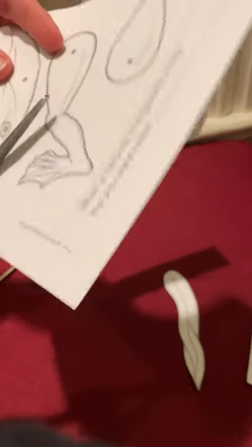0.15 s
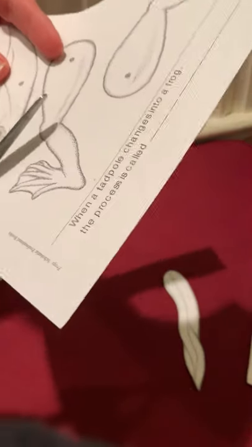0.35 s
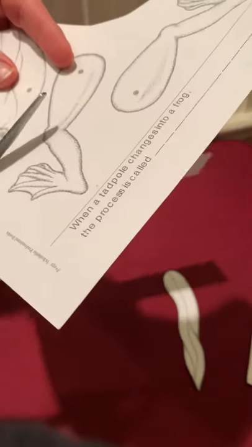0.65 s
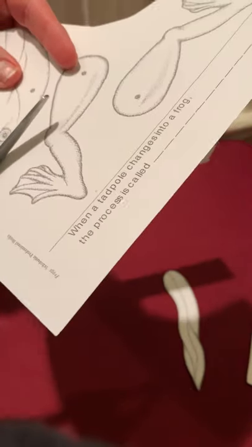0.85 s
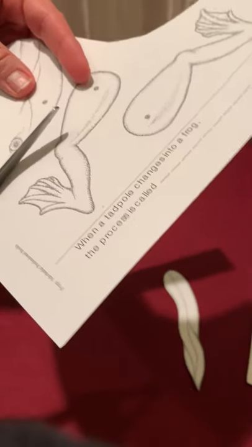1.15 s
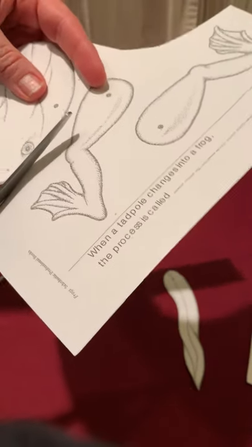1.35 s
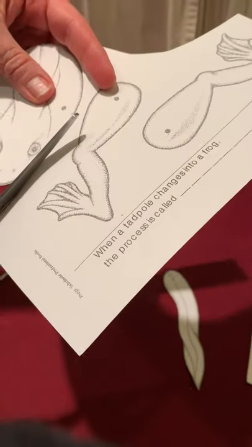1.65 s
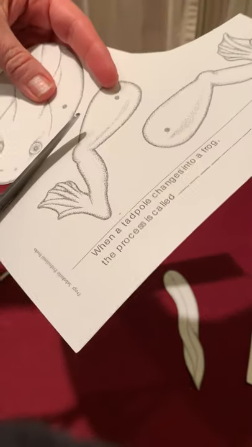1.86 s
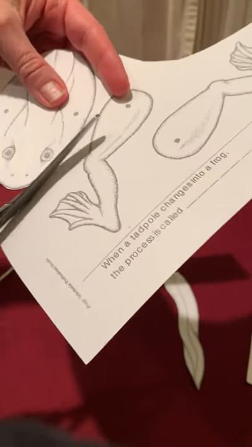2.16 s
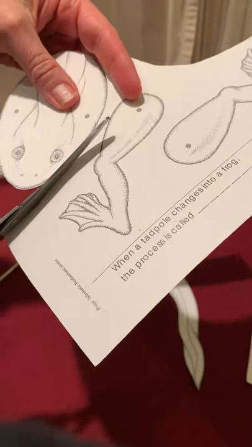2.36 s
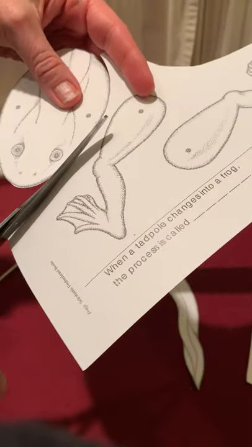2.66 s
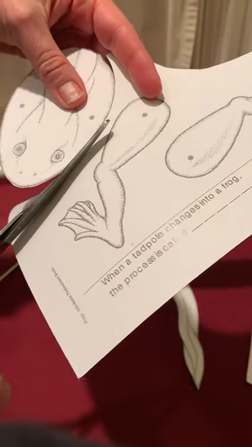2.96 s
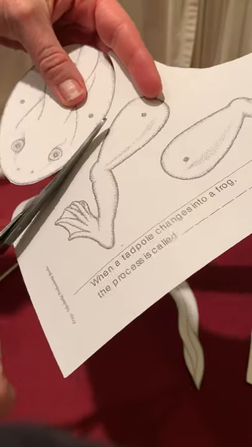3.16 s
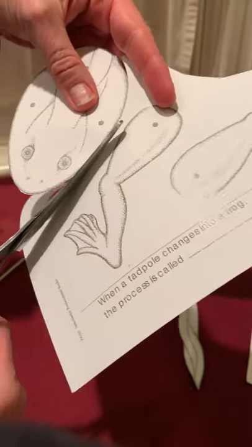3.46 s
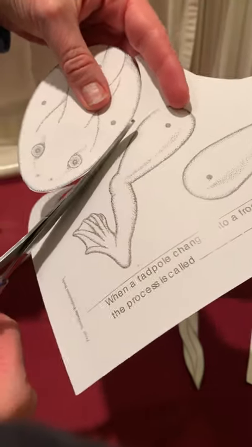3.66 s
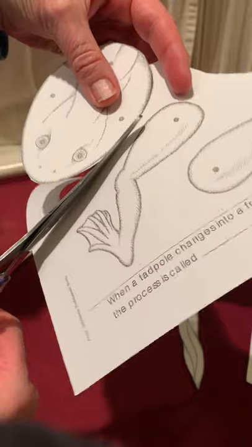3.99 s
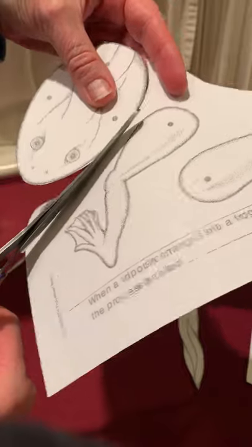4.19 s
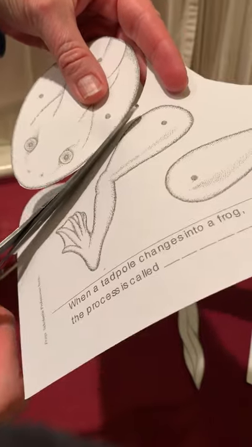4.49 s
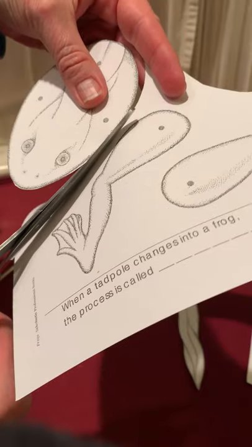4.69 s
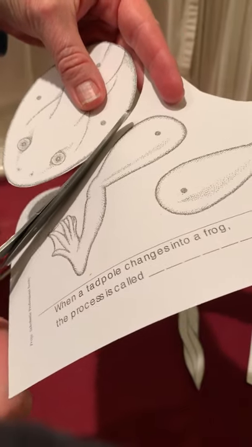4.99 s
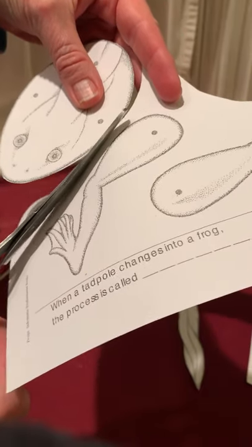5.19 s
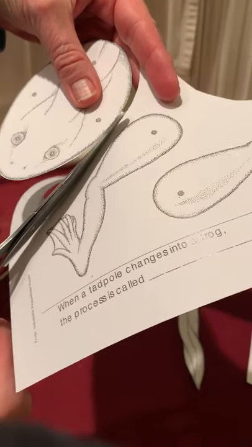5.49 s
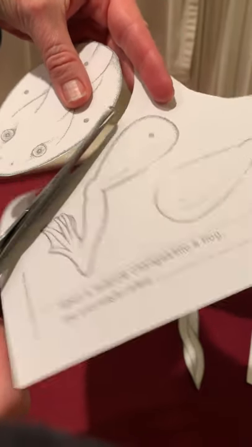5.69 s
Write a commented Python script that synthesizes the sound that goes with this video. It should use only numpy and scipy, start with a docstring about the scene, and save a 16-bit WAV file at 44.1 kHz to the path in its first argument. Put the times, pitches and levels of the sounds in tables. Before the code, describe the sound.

Scissors crunch through stiff card in short irregular snips, with papery rubbing and a few soft low thumps, close up in a quiet room.

```python
"""Crisp crunches, papery rubbing and a few soft thumps: scissors work through hand-held cardstock in a quiet room.
Each bite is a burst of fibre snaps that excites a crunch, the ringing sheet, a papery flap and a bright fizz.
Between bites, grain noise shaped by hand strokes and blade drag makes the rubbing; now and then the sheet buckles
with a low sine whose pitch sags. Two microphones hear it close up, over a faint room and its tone.
"""
import sys
import numpy as np
from scipy import signal
from scipy.fft import rfft, irfft, next_fast_len
from scipy.io import wavfile
from scipy.ndimage import uniform_filter1d, map_coordinates

SR = 44100
rng = np.random.default_rng(int(sys.argv[2]) if len(sys.argv) > 2 else 0)


def dump(signal):
    """Clip the signal to [-1, 1] and save it as 16-bit WAV at the path in sys.argv[1]."""
    limited = np.clip(np.atleast_2d(signal).T, -1, 1)
    pcm = np.round(limited * 32767).astype(np.int16)
    wavfile.write(sys.argv[1], SR, pcm)


N = 257323
TIME = np.arange(N) / SR  # s

# Steady tone of the room. Each row: frequency in Hz, relative level in dB.
ROOM_TONE_COLOUR = [(85, -2), (200, -12), (1000, -31.5), (3000, -32.5), (16000, -35.5)]
ROOM_T60 = 0.23  # s
# Phase between the two microphones. Each row: frequency in Hz, lead of the left one in radians.
LEFT_LEAD = [(90, 0), (400, -.8), (620, -.3), (950, -1.2), (1400, -.1), (2000, .4), (2550, 1.7),
             (3400, 1.3), (4850, 3.14), (9100, 9.42), (13400, 15.7), (16000, 19.5)]
# Level between the two microphones. Each row: frequency in Hz, left minus right in dB.
LEFT_BALANCE = [(750, .5), (1350, -3), (1800, -0.8), (2500, -2), (3300, -0.5)]
BAND_LIMIT = 16100  # Hz

# The sheet buckles. Each row: start in seconds, level in dB before attack and decay,
# pitch it settles to in Hz, time to fall 60 dB in seconds.
BUCKLES = [(.108, -48, 127, 0.14), (0.214, -50, 125, 0.17), (1.228, -39.5, 59.5, 0.14),
           (3.313, -39.5, 81, 0.16), (5.731, -27.5, 89.3, 0.056), (5.79, -38.5, 60.6, 0.16)]
# Low flexing of the sheet. Each row: frequency in Hz, relative level in dB.
FLEX_COLOUR = [(25, -16.5), (90, -4.5), (300, 0), (600, -9), (1500, -65)]

# Card slides over steel and fingers. Each row: start in seconds, length in seconds, nominal rub level in dB,
# flexing in dB relative to the rub, hiss in dB relative to the rub.
STROKES = [(0, 0.024, -60, -6.5, 3), (0.026, .035, -71, -5, 6), (0.071, 0.049, -61, -5, 1.5),
           (0.125, 0.042, -52, -6.5, -3.5), (0.194, 0.028, -52.5, 0, 2.5), (0.282, 0.069, -57.5, 1, -8.5),
           (0.348, 0.073, -66, -8, -12), (1.108, 0.0087, -68, -14, -0.5), (1.414, 0.035, -66.5, -4.5, -10),
           (1.97, 0.063, -49.5, -5, -7.5), (2.346, 0.11, -70.5, -16, -12), (2.45, 0.06, -60.5, -23, -6.5),
           (2.608, 0.016, -59.5, -22, -16), (2.665, 0.013, -61, -18, -11), (2.742, 0.013, -62, -14, -10.5),
           (2.81, .016, -44.5, -11.5, -15), (2.925, 0.17, -51, -14, -16), (3.126, 0.019, -46, -24, -16.5),
           (3.261, 0.042, -47, -11, -10), (3.758, 0.071, -54, -6, -13), (3.84, 0.12, -71, -14, -3),
           (3.997, 0.067, -64, -17.5, -2.5), (4.07, 0.14, -70, -19, -9), (4.204, 0.086, -46, -10, -20.5),
           (4.355, 0.029, -57, -7.5, -21), (4.397, 0.033, -54, -8, -19), (4.596, 0.042, -56, -2.5, -17),
           (4.725, 0.024, -56.5, -8, -16), (4.821, 0.029, -62, -9.5, -17.5), (4.882, 0.032, -58.5, -4, -31),
           (4.992, 0.093, -61, -6.5, -23), (5.149, 0.028, -53.5, -9.5, -20),
           (5.23, 0.072, -55.5, -2.5, -24), (5.417, .025, -65.5, -3, -35), (5.747, 0.033, -59.5, 8.5, -11),
           (5.816, 0.023, -63, 15, -25)]
# A stroke swells before its start, arches over its length and dies away after it.
SWELL_DB_PER_S, ARCH_DB, FADE_DB_PER_S = 1050, 3.5, 400.5
# The blades press into the card just before a bite and drag on ever more lightly after it.
PRESS_DB_PER_S, DRAG_FADE_DB_PER_S = 1701, 240
DRAG_DB = -18.5  # relative to the bite's crunch
DRAG_FLEX_DB, DRAG_HISS_DB = -6, -12.5  # relative to the drag
# Rubbing while the sheet slides loose. Each row: frequency in Hz, relative level in dB.
LOOSE_RUB_COLOUR = [(300, -34.5), (560, 0.5), (830, 1.5), (1100, -3), (1800, -0.5), (2700, -4.5), (3400, 3),
                    (4200, -13.5), (9000, -73)]
# Rubbing while the sheet is wedged. Each row: frequency in Hz, relative level in dB.
WEDGED_RUB_COLOUR = [(300, -40), (650, 1), (1120, -4), (1360, 3), (2300, -5.5), (3200, -8.5), (4300, -17),
                     (9000, -80.5)]
# Fine hiss of the rubbing. Each row: frequency in Hz, relative level in dB.
HISS_COLOUR = [(2500, -19), (5200, 0), (7850, -9.5), (8200, -10.5), (10000, -7.5), (11000, -13.5),
               (15700, -26.5)]

# Progress of the cut. Each row: time in seconds, wedging from 0 (loose in the hand) to 1 (wedged along the blades).
WEDGING = [(.8, 0.048), (1.9, 0.5), (3.1, 1)]
# Lowest bending mode of the held sheet: Hz when loose, Hz when wedged.
BEND_HZ = (186.6, 301)

# The blades bite. Each row: start in seconds, length in seconds, crunch level in dB before the held sheet colours it.
BITES = [(0.472, 0.021, -52.5), (0.521, 0.026, -48.5), (.577, 0.021, -42), (0.61, 0.022, -49),
         (0.677, 0.012, -43), (0.735, 0.0066, -40), (0.806, 0.014, -45), (.827, 0.012, -51),
         (0.843, 0.014, -52), (0.857, 0.04, -55.5), (.908, 0.0089, -54), (1.187, .008, -47.5),
         (1.349, 0.0082, -44.5), (1.381, 0.018, -57.5), (1.512, 0.0087, -51.5), (1.538, 0.009, -59),
         (1.616, 0.0049, -48.5), (1.662, 0.009, -46), (1.678, .01, -46), (1.693, 0.011, -45.5),
         (2.245, 0.02, -44.5), (2.269, 0.017, -41.5), (2.294, 0.017, -42), (2.316, 0.016, -46.5),
         (2.563, 0.0096, -43), (2.791, 0.0097, -37), (2.837, 0.0039, -48), (2.868, 0.01, -48.5),
         (2.947, 0.013, -42.5), (2.989, 0.0066, -40), (3.012, .007, -40.5), (3.037, 0.0081, -49),
         (3.305, 0.0095, -50.5), (3.54, 0.0037, -44.5), (3.593, 0.013, -38.5), (3.748, 0.014, -45.5),
         (3.781, 0.015, -56), (3.807, 0.0098, -47.5), (4.121, 0.0053, -50.5), (4.13, 0.004, -51),
         (4.245, 0.0028, -43), (4.579, 0.012, -41), (4.617, .011, -54.5), (4.633, 0.0038, -48),
         (4.86, 0.012, -49), (5.011, 0.0029, -49), (5.094, 0.0046, -55.5), (5.22, 0.009, -42),
         (5.247, 0.008, -45.5), (5.283, 0.025, -49.5), (5.311, 0.0094, -44.5), (5.403, 0.0088, -43.5),
         (5.517, .016, -47), (5.565, 0.0078, -48.5), (5.724, 0.0061, -33), (5.806, 0.0047, -47)]
# Each closing of the blades bends the sheet anew and colours all its bites. Each row: start in seconds,
# then sheet ring, flap and fizz, each in dB relative to the crunch.
SNIPS = [(.45, -6.5, -12.5, -4.5), (.66, -2, -8.5, -6.5), (1.15, -2, -6.5, -9.5), (2.2, 1, -9.5, -9.5),
         (2.5, 1, -16, -13), (2.92, 8, -12, -12), (3.28, 4, 9.5, -18), (3.5, -5, -3.5, -16),
         (3.72, 6, -1, -9), (4.1, -1.5, -7, -8), (4.2, -28.5, -10, -13.5), (5.2, -8.5, -8, -14.5),
         (5.38, -2, -4, -19), (5.7, -6.5, -10.5, -9), (5.79, 10, 2.5, -13.5)]
# Ringing modes of the sheet. Each row: nominal frequency in Hz, width in Hz, relative level in dB.
SHEET_MODES = [(775, 170, -3), (885, 125, 0)]
# Body of a bite. Each row: frequency in Hz, relative level in dB.
CRUNCH_COLOUR = [(500, -67), (950, -7), (1400, -4), (1850, -4.5), (2300, -11.5), (2900, -9), (4400, -16.5),
                 (8000, -63.5)]
# Low papery part of a bite. Each row: frequency in Hz, relative level in dB.
FLAP_COLOUR = [(30, -23), (170, -7), (330, -6.5), (450, -1.5), (640, -4.5), (900, -8), (2000, -51.5)]
# Bright edge of a bite. Each row: frequency in Hz, relative level in dB.
FIZZ_COLOUR = [(2500, -29.5), (4800, -0.5), (5800, 5.5), (7850, -6), (8200, 0), (10000, 0), (10700, -4.5),
               (15700, -12)]


def amp(db):
    """Decibels to gain."""
    return 10 ** (np.asarray(db) / 20)


def unit(x):
    """x at rms 1."""
    return x / np.sqrt(np.mean(x ** 2) + 1e-30)


def along(points, hz):
    """Read (Hz, value) points on a log frequency axis."""
    point_hz, values = np.transpose(points)
    return np.interp(np.log(hz + 1), np.log(point_hz), values)


def random_level(rate):
    """A random value that stays all but constant: it creeps along a random curve by rate / SR knots a second."""
    knots = rng.standard_normal(int(N * rate / SR) + 4)
    return map_coordinates(knots, [TIME * rate / SR])


def filtered(x, response):
    """Filter x by a complex response of frequency in Hz."""
    size = next_fast_len(N + 8192)
    hz = np.fft.rfftfreq(size, 1 / SR)
    return irfft(rfft(x, size) * response(hz), size)[..., :N]


def coloured(x, spectrum):
    """x shaped by a spectrum, at rms 1."""
    return unit(filtered(x, lambda hz: amp(along(spectrum, hz))))


def room_tone():
    """Low rumble, mostly shared by both microphones, with a little rumble and hiss of their own."""
    rumble = coloured(rng.standard_normal((3, N)), ROOM_TONE_COLOUR)
    shared = amp(-71.5) * microphones(rumble[0])
    own_rumble = amp(-83.0) * rumble[1:]
    own_hiss = amp(-97.0) * rng.standard_normal((2, N))
    return shared + own_rumble + own_hiss


def room(x, early=0.25, count=8):
    """A faint diffuse tail begins at once, with a few early reflections within it, different at each microphone."""
    t = np.arange(SR // 2) / SR
    echo = rng.standard_normal((2, len(t))) * amp(-60 * t / ROOM_T60)
    echo /= np.linalg.norm(echo[0])
    for port in echo:
        # the table and nearby things reflect 1 to 5 ms after the sound
        arrivals = rng.integers(SR // 1000, SR // 200, count)
        port[arrivals] += early * rng.choice([-1, 1], count)
    # cloth and curtains swallow the treble above 4 kHz
    dull = filtered(x, lambda hz: 1 / (1 + 1j * hz / 4000))
    return signal.fftconvolve(dull[None], echo, axes=1)[:, :N]


def microphones(x):
    """A near source reaches the two microphones at different times and strengths."""
    lead_hz, lead = np.transpose(LEFT_LEAD)
    halves = np.array([[.5], [-.5]])  # left and right share each difference equally

    def response(hz):
        phase = halves * np.interp(hz, lead_hz, lead)
        return np.exp(1j * phase) * amp(halves * along(LEFT_BALANCE, hz))

    return filtered(x, response)


def buckles(attack=0.0034, sag=0.84, sag_time=0.0086, ragged=0.095):
    """The whole sheet gives way: a low, quickly damped flap whose pitch sags as it relaxes."""
    out = np.zeros(N + SR)
    t = np.arange(SR // 3) / SR
    flutters = coloured(rng.standard_normal(N), FLEX_COLOUR)
    for k, (start, db, hz, t60) in enumerate(BUCKLES):
        pitch = hz * (1 + sag * np.exp(-t / sag_time))
        phase = 2 * np.pi * np.cumsum(pitch) / SR
        flutter = flutters[k * len(t):][:len(t)]
        envelope = amp(db - 60 * t / t60) * (1 - np.exp(-t / attack))
        out[round(start * SR):][:len(t)] += envelope * (np.sin(phase) + ragged * flutter)
    return out[:N]


def friction(step=32):
    """Strengths of scraping, flexing and hiss: hand strokes plus the drag around each bite, added as power."""
    t = TIME[::step]
    power = np.zeros((3, len(t)))
    for start, length, db, flex_db, hiss_db in STROKES:
        before, after = np.maximum(start - t, 0), np.maximum(t - start - length, 0)
        arch_db = ARCH_DB * (2 * np.clip((t - start) / length, 0, 1) - 1) ** 2
        ends_db = SWELL_DB_PER_S * before + FADE_DB_PER_S * after
        stroke = amp(db - arch_db - ends_db)
        power += np.outer(amp([0, flex_db, hiss_db]), stroke) ** 2
    for start, length, db in BITES:
        before, after = np.maximum(start - t, 0), np.maximum(t - start - length, 0)
        drag = amp(db + DRAG_DB - PRESS_DB_PER_S * before - DRAG_FADE_DB_PER_S * after)
        power += np.outer(amp([0, DRAG_FLEX_DB, DRAG_HISS_DB]), drag) ** 2
    return [np.interp(TIME, t, np.sqrt(p)) for p in power]


def fibres(count, rate, spread_db):
    """Tiny snaps at random moments, rate a second, of log-normal size up to that of the thickest fibre."""
    size_db = spread_db * np.minimum(rng.standard_normal(count), 2)
    happens = rng.random(count) < rate / SR
    return happens * rng.choice([-1, 1], count) * amp(size_db)


def patchy(x, depth_db):
    """Resonances come and go as the card bends: random gains, smooth in time and frequency."""
    z = signal.stft(x, nperseg=512)[2]
    patch = np.outer(np.hanning(7), np.hanning(24))  # frequency bins by frames
    field = signal.fftconvolve(rng.standard_normal(z.shape), patch, "same")
    return unit(signal.istft(z * amp(depth_db * unit(field)), nperseg=512)[1][:N])


def rubbing(wedged, spread_db=0.5, flex_spread_db=6.5, tick_db=-9):
    """The grain of the card catches and slips under steel and skin, and the sheet flexes with it."""
    scraping, flexing, hissing = friction()
    grain = unit(fibres(N, rate=1300, spread_db=7.5) + 0.4 * rng.standard_normal(N))
    # now and then a coarser fibre lets go with a tick of its own
    grain = grain + amp(tick_db) * unit(fibres(N, rate=45, spread_db=4))
    pressure = amp(spread_db * random_level(110) - 1)  # centred 1 dB below the nominal rub level
    loose_rub = (1 - wedged) * coloured(grain, LOOSE_RUB_COLOUR)
    wedged_rub = wedged * coloured(grain, WEDGED_RUB_COLOUR)
    scrape = scraping * patchy(loose_rub + wedged_rub, depth_db=3.5)
    hiss = hissing * patchy(coloured(grain, HISS_COLOUR), depth_db=5.0)
    flex_gain = amp(flex_spread_db * random_level(30))
    flex = flexing * flex_gain * coloured(rng.standard_normal(N), FLEX_COLOUR)
    return pressure * (scrape + hiss + flex)


def held(x, wedged, width_hz=60, bend_db=-2, edge_hz=12300, dull_db=-21, bright_db=4):
    """As the card wedges, a low bending mode crossfades to a higher one.

    Separately, the treble above about 12 kHz goes from dull to bright over the same time.
    """
    def resonance(mode):
        return filtered(x, lambda hz: 1j * hz * width_hz / (mode ** 2 - hz ** 2 + 1j * hz * width_hz))

    slack, taut = [resonance(mode) for mode in BEND_HZ]
    bending = amp(bend_db) * ((1 - wedged) * slack + wedged * taut)
    top = filtered(x, lambda hz: 1 - 1 / (1 + (hz / edge_hz) ** 20))
    top_gain = amp(dull_db + (bright_db - dull_db) * np.sqrt(wedged))
    return x + bending + top * (top_gain - 1)


def causal(spectrum, ripple_db, size=2048):
    """A minimum-phase click with this spectrum, rippled by whichever modes of the card the blade happens to find."""
    hz = np.fft.rfftfreq(size, 1 / SR)
    noise = rng.standard_normal(len(hz))
    ripple = unit(uniform_filter1d(uniform_filter1d(noise, size=11), size=11))
    cepstrum = irfft(np.log(amp(along(spectrum, hz) + ripple_db * ripple)))
    # folding the cepstrum forward puts the energy as early as it can be
    cepstrum[1:size // 2] *= 2
    cepstrum[size // 2 + 1:] = 0
    return irfft(np.exp(rfft(cepstrum)))


def sheet_ring(t):
    """Damped modes of the stiff sheet, which is bent a little differently at every bite."""
    stiffness = np.exp(.055 * rng.standard_normal())
    ring = np.zeros(len(t))
    for k, (hz, width, db) in enumerate(SHEET_MODES):
        decay = amp(db) * np.exp(-np.pi * width * t)
        ring += (-1) ** k * decay * np.sin(2 * np.pi * hz * stiffness * t)
    return ring


def bites(rise=0.0026, release=0.0023, size=2048):
    """Each bite is a run of snapping fibres, heard directly and through the sheet."""
    t = np.arange(size) / SR
    out = np.zeros(N + 4 * size)
    for start, length, db in BITES:
        _, ring_db, flap_db, fizz_db = [snip for snip in SNIPS if snip[0] <= start][-1]
        ring = sheet_ring(t)
        crunch = causal(CRUNCH_COLOUR, ripple_db=3.5)
        flap = causal(FLAP_COLOUR, ripple_db=2)
        fizz = causal(FIZZ_COLOUR, ripple_db=4.5)
        # the blade breaks loose, runs through the card and sticks again
        run = np.clip(t / rise, 0, 1) ** 2 * np.exp(-np.maximum(t - length * 0.82, 0) / release)
        snaps = run * (fibres(size, rate=2200, spread_db=5.5) + 0.17 * rng.standard_normal(size))
        gains = amp(db + np.array([0, ring_db, flap_db, fizz_db]))
        for voice, gain in zip([crunch, ring, flap, fizz], gains):
            sound = signal.fftconvolve(snaps, voice)
            # the voice's energy equals its level held over the bite's length
            sound *= gain * np.sqrt(length * SR) / np.linalg.norm(sound)
            first = round((start - .0008) * SR)  # 0.8 ms early
            out[first:][:len(sound)] += sound
    return out[:N]


def scene():
    """Cutting and handling near the microphones, in a small quiet room; the buckles are heard without the room."""
    wedged = np.interp(TIME, *np.transpose(WEDGING))
    card = held(bites() + rubbing(wedged), wedged)
    return microphones(card + buckles()) + amp(-13.0) * room(card) + room_tone()


def record(dry):
    """The recorder cuts steeply above its band limit."""
    return filtered(dry, lambda hz: 1 / (1 + (hz / BAND_LIMIT) ** 120))


dry = scene()
out = record(dry)
dump(out)
```